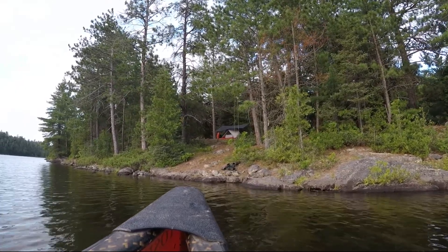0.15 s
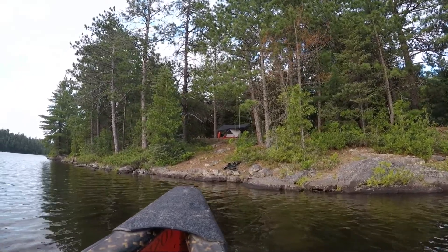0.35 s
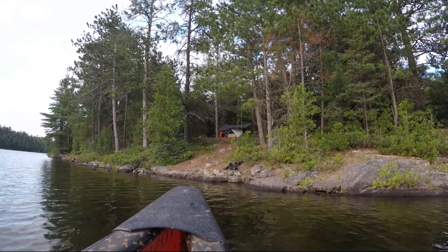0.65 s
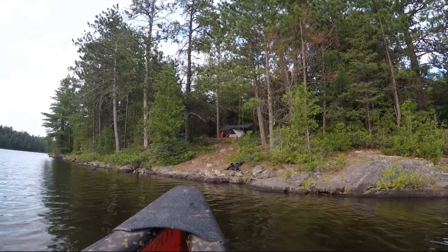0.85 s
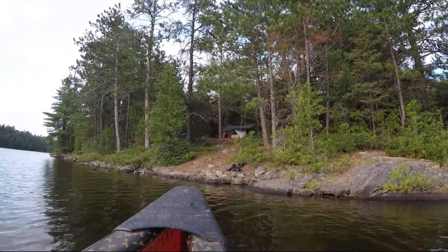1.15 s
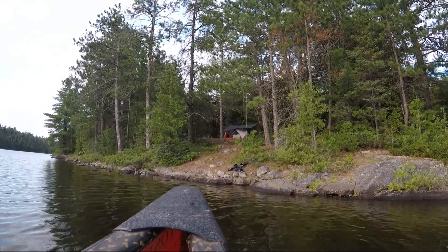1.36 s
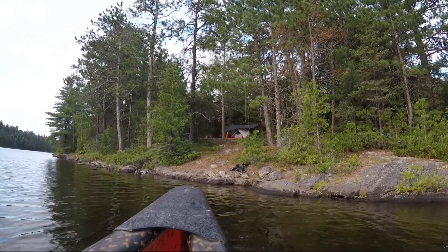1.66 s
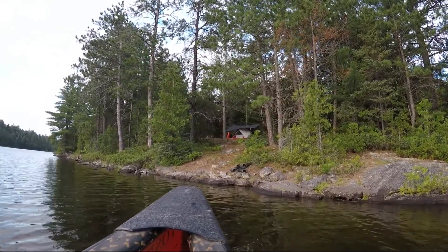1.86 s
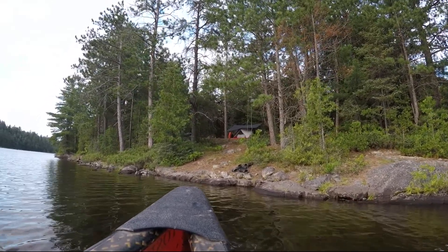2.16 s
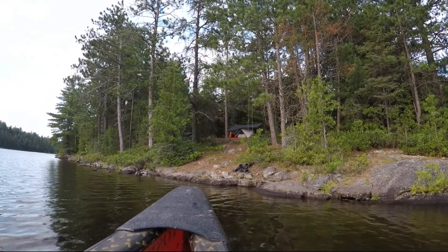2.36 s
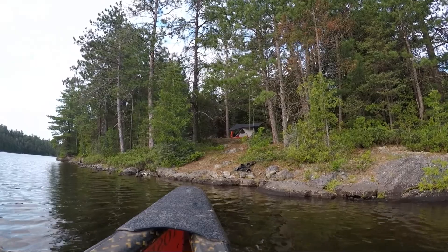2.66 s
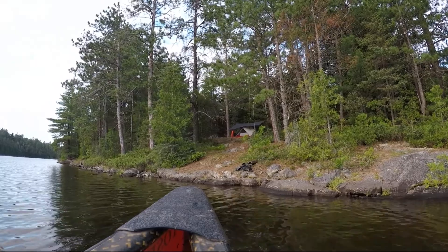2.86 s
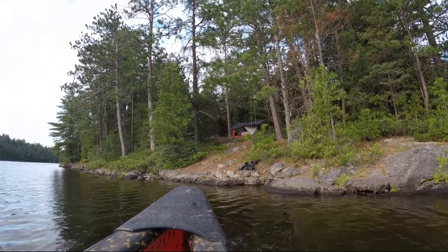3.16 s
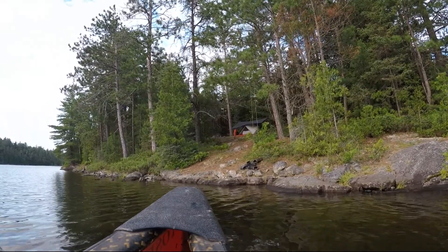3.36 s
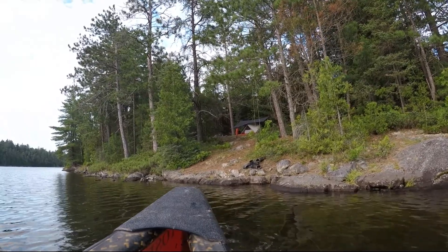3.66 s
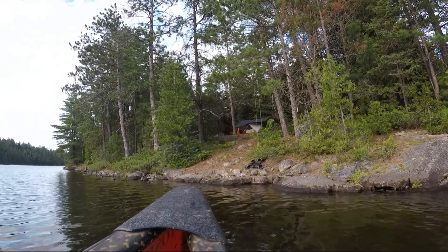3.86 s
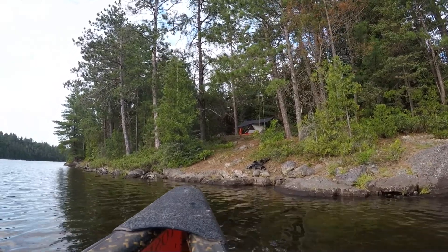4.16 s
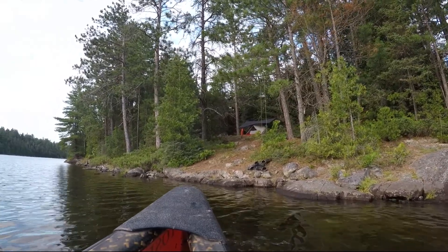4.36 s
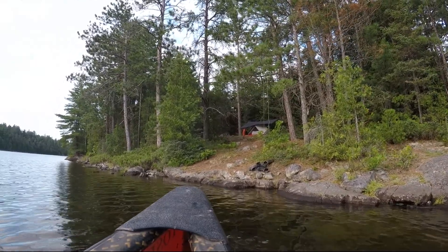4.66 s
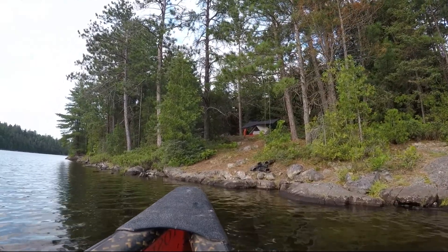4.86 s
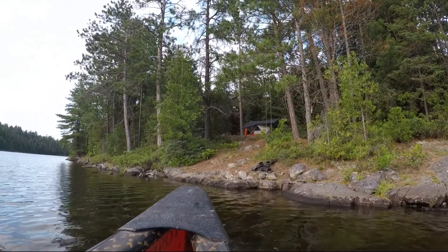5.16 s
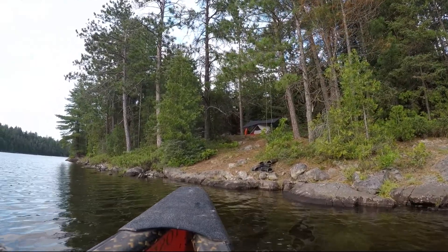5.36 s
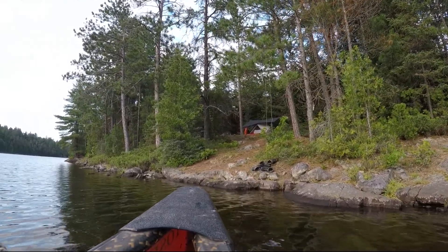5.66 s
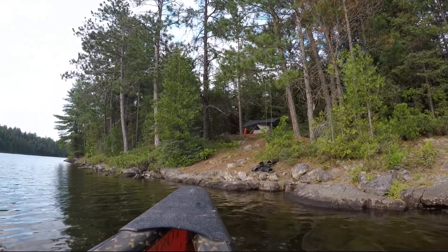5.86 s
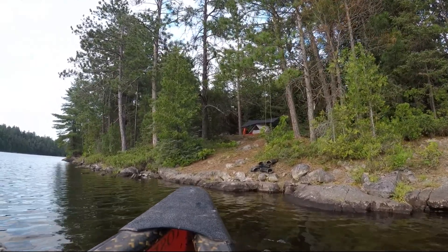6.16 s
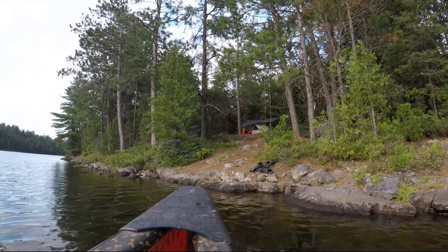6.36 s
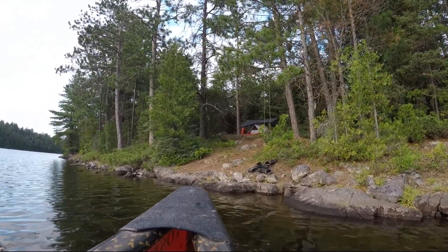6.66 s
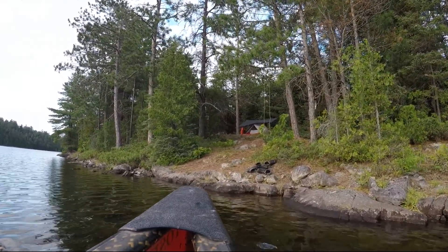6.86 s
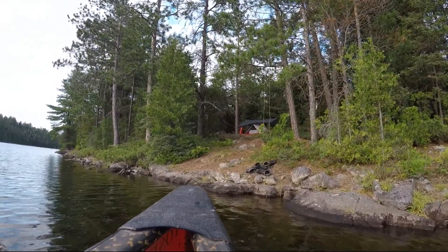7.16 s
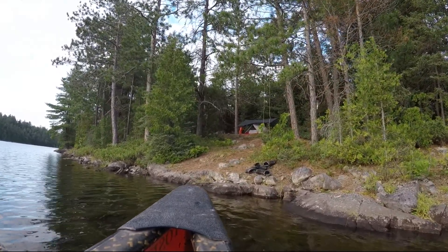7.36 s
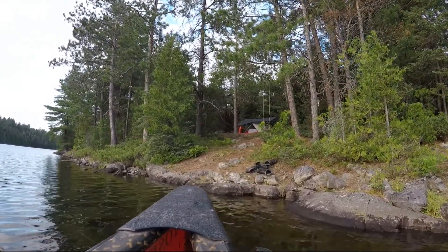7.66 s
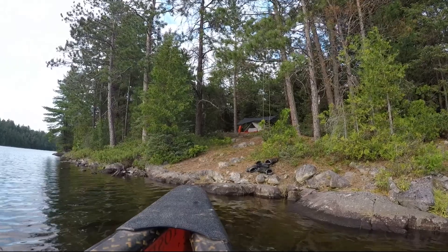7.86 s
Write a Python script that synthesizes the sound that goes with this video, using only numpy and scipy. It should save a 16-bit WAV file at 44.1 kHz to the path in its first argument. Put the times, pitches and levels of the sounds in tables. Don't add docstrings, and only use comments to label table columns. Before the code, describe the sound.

A paddle shaft knocks and drags on a hollow canoe hull, one hard slam midway, with faint lapping water and a brief wet swish.

```python
import sys
import numpy as np
from scipy import signal
from scipy.fft import rfft, irfft, next_fast_len
from scipy.io import wavfile
from scipy.ndimage import uniform_filter1d, map_coordinates

SR = 44100
rng = np.random.default_rng(int(sys.argv[2]) if len(sys.argv) > 2 else 0)


def file_out(sig):
    cols = np.atleast_2d(sig).T
    lim = np.clip(cols, -1, 1)
    pcm = np.round(lim * 32767).astype(np.int16)
    wavfile.write(sys.argv[1], SR, pcm)


def ratio(d):
    e = np.asarray(d, float) / 20
    return 10 ** e


N = 353241

# time_s, level_db
HISS_LEVEL = [(0.0, -66), (3.7, -66), (4.71, -67), (6.47, -66), (6.67, -66), (7.09, -65.5), (8.01, -67)]
# freq_hz, density_db
HISS_SPECTRUM = [(880, -2), (1500, -2), (1740, -4), (1890, -3.5), (2050, -6), (2210, -5), (3270, -15.5),
                 (4590, -11), (7040, -13.5), (7990, -10.5), (9800, -11), (11000, -14), (11600, -20),
                 (12300, -18), (14300, -19.5), (15300, -22)]
# time_s, level_db
WIND_LEVEL = [(0, -53.5), (.3, -58.5), (.47, -38.5), (.65, -48.5), (1.2, -45.5), (1.5, -50.5), (1.63, -38),
              (1.94, -45), (2.85, -42.5), (3.48, -51.5), (3.7, -48), (4.7, -42.5), (5.04, -43.5),
              (5.33, -38), (6.4, -54), (6.75, -58.5), (7.5, -41.5), (8.01, -37.5)]
# freq_hz, density_db
WIND_SPECTRUM = [(8.8, -29.5), (15, -4.5), (32, 2), (85, -5), (110, -35.5), (190, -120)]
WATER_SPECTRUM = [(110, -14), (190, -3), (323, -4), (550, -10), (596, -10), (661, -12), (3000, -34.5),
                  (3900, -39), (6600, -120)]
# peak_s, rise_s, fall_s, level_db
SURGES = [(.4, .3, 0.313, -51.5), (2.25, 0.19, 0.36, -61.5), (3.6, 0.63, 0.336, -49.5),
          (4.15, 0.13, 0.56, -46), (5.1, 0.61, 0.566, -55), (6.8, 0.37, 1.8, -50.5)]
# time_s, load_db, trim_db (toward the deep mode)
LOAD = [(0, -54, -1), (.3, -56.5, 1), (.56, -43.5, 7), (1.4, -56.5, -3), (1.72, -38.5, 8.5), (2.0, -53, 5),
        (2.7, -53, 3), (3.01, -47.5, 4.5), (3.55, -55, 3), (3.7, -47, 11), (3.97, -45.5, -15),
        (4.17, -46.5, 6), (4.6, -45.5, -4), (5.44, -55.5, 11), (6.2, -56, -2), (7.1, -61, -12.5),
        (7.45, -51, -2.5), (8.01, -53.5, -4)]
# freq_hz, width_hz, level_db
HULL_MODES = [(100, 73, 0), (170, 74.7, 0)]
# time_s, level_db
TREBLE_HISS_LEVEL = [(6.15, -84), (6.3, -78), (6.5, -67.5), (7.0, -68), (7.7, -69), (8.01, -77)]
# freq_hz, density_db
TREBLE_HISS_SPECTRUM = [(6500, -32), (7800, -7.5), (9000, 4.5), (10500, -5), (11500, 3), (12300, -16),
                        (15000, -30.5)]
# start_s, peak_db, pitch_hz, housing_4khz_db, housing_6khz_db
TICKS = [(0.435, -51, 1550, 0.5, 1), (0.455, -54, 1520, -0.5, -11.5), (0.796, -43, 1500, -20, -25),
         (0.838, -49, 5380, -10, -5.5), (0.85, -45, 3710, 1.5, -2), (1.655, -57.5, 1298, 3, 0.5),
         (1.68, -56, 2100, 3.5, 3.5), (4.134, -67, 2600, 1, -10.5), (4.261, -55.5, 2600, 5, -8),
         (1.7494, -57.5, 1572, 9.5, -11.5), (2.1904, -44, 1840, -22, -22), (2.357, -44, 2050, -16.5, -15),
         (2.4839, -38, 2875, -11, -24.5), (4.4644, -43, 1650, -22, -15.5), (6.9521, -39, 950, -17, -25),
         (6.9708, -36.5, 2360, -18, -24), (6.992, -48, 1870, -7, -9.5), (7.2196, -45.5, 1670, -15, -15),
         (7.5414, -27.5, 1967, -1, -13), (3.597, -37, 820, -25.5, -31.5), (3.606, -29, 800, -20, -27),
         (2.486, -50, 3500, -6.5, -20)]
# start_s, peak_db
SPARKS = [(1.6377, -52), (1.6772, -52), (1.697, -58), (1.7036, -53), (1.718, -56), (.44, -62), (.85, -58)]
# peak_s, rise_s, fall_s, level_db, fullness_db (rustle over the housing's ring)
SWISHES = [(6.477, 0.0071, 0.0374, -45.5, -8), (6.545, 0.074, 0.0231, -43.5, -7.5),
           (6.656, .012, 0.0396, -57, -11.5), (6.692, 0.044, 0.023, -56.5, -7),
           (6.761, 0.024, 0.0473, -49.5, -8), (6.885, 0.1026, 0.0794, -47.5, -6.5),
           (7.012, 0.077, 0.071, -53.5, 0.5), (7.085, 0.0795, 0.0382, -46.5, -0.5),
           (7.118, 0.024, 0.038, -57, 2), (7.175, 0.0403, 0.037, -58, 4.5),
           (7.205, 0.042, 0.0194, -61, 6.5)]
# freq_hz, width_hz, level_db
HOUSING_MODES = [(2290, 450, -40), (2927, 290, 7.5), (4117, 580, 12.5), (4970, 210, -14.5), (5760, 590, 0),
                 (6785, 440, -2)]
# freq_hz, width_hz, level_db
RUSTLE_MODES = [(1232, 536, -2), (1650, 316, 3), (2264, 583, -1.5)]
RUSH_MODES = [(3500, 1070, 0.14), (4700, 1300, 2), (5900, 780, 0)]
# freq_hz, density_db
SPRAY_SPECTRUM = [(2000, -30.5), (3000, -11), (7500, -0.5), (9000, -2.5), (11300, -5), (12500, 1),
                  (15000, -5), (15500, -60.5)]
# peak_s, rise_s, fall_s, level_db, brightness_db
SCRAPES = [(.188, 0.094, 0.084, -52.5, -10.5), (.41, 0.085, 0.094, -52.5, -8),
           (.57, 0.0186, 0.091, -62.5, -9.5), (1.635, 0.044, 0.11, -48.5, -13),
           (1.675, .04, 0.038, -51.5, -18.5), (1.72, 0.074, 0.049, -56, 1),
           (4.13, 0.221, 0.11, -41.5, -24.5), (4.24, 0.1294, 0.1306, -39, -19),
           (4.49, 0.04, 0.12, -47, -22), (3.65, .03, .12, -46, -25), (4.3, .04, .03, -51, -25),
           (5.22, .03, .05, -60, -25)]
# freq_hz, density_db
SCRAPE_SPECTRUM = [(260, -37.5), (450, 1.5), (613, -16), (685, 2.5), (1020, -5.5), (1090, 4.5),
                   (1170, -2.5), (1500, -1), (3000, -20.5), (3900, -46), (6600, -120)]
GRIT_SPECTRUM = [(1650, -35.5), (2800, -31), (4140, 8), (4640, 7), (5860, 0.5), (6070, 6), (8000, -20),
                 (10400, -43), (17600, -120)]
# freq_hz, width_hz, level_db
SHAFT_MODES = [(1752, 190, -3.5), (2600, 270, -1.5), (3820, 260, -1.5), (4760, 300, -11), (5865, 350, -5)]
# peak_s, rise_s, fall_s, level_db, pitch_hz
GROANS = [(.2, 0.074, 0.113, -39.5, 138.1), (0.389, 0.038, 0.22, -35.5, 134.8),
          (.54, 0.256, 0.19, -43.5, 111.8), (1.636, 0.037, 0.25, -29, 128),
          (1.725, 0.095, 0.238, -27.5, 116), (4.196, 0.06, 0.11, -20.5, 119.8),
          (4.27, 0.0487, 0.223, -33, 136.9), (4.42, 0.168, .06, -36, 122.4),
          (4.522, 0.049, 0.0951, -27.5, 118.1), (4.62, 0.052, 0.204, -33, 125.6),
          (7.569, 0.17, 0.087, -33.5, 122.2), (7.75, 0.069, 0.038, -41.5, 100)]
# freq_hz, width_hz, level_db
RATTLE_MODES = [(231.5, 168, -3.0), (363.1, 73.6, 0.0), (415.7, 107, -6.0)]
# start_s, peak_db, shell_ring_db, snap_db, shaft_clack_db
CRACKS = [(0.44, -44, 2.5, -10.5, -19.5), (0.803, -31.5, -25, -22.5, -18.5), (1.421, -39.5, -15, -17, -5),
          (1.637, -44, 7, -9.5, -22), (1.692, -39.5, 4, -14.5, -16), (1.714, -43.5, 4.5, -10, 1),
          (2.81, -60.5, 14.5, -17.5, -11), (3.047, -58.5, 9, -2, -14), (3.6148, -19, 0.5, -14, -15.5),
          (3.626, -24, -8, -27, -13), (3.656, -33, 2, -18, -9), (3.897, -28, 2.5, -27.5, -18),
          (4.0235, -23.5, -3.5, -30.5, -1.5), (4.496, -48, 11.5, -23, -18), (4.934, -30, -6.5, -17.5, -5.5),
          (6.470, -38.5, -7.5, -8, -30), (7.478, -26, -12, -24, -9), (7.967, -28, -9, -23.5, -20.5)]
# freq_hz, density_db
CRACK_SPECTRUM = [(290, -5), (500, -21.5), (845, -7), (1070, -19), (1350, -17), (2410, -26.5),
                  (3000, -40.5), (3900, -32.5), (6600, -120)]
SNAP_SPECTRUM = [(1650, -14.5), (2800, -14), (3610, -15.5), (3920, -14), (5890, -18), (7230, -35),
                 (9440, -23), (15000, -39)]
# freq_hz, level_db, t60_s
SHELL_MODES = [(267, -3.5, 0.445), (348.65, -2, 0.214), (417.8, -8.5, 0.461), (530.4, -12.5, 0.305),
               (701.2, -6, 0.094), (835.1, -10, 0.227)]
# freq_hz, t60_s
SHELL_DECAY = [(300, 0.287), (1000, 0.079), (3000, 0.0803), (10000, 0.029)]
# start_s, peak_db, low_mode_hz, high_mode_hz, low_share_db
KNOCKS = [(0.377, -22, 101, 186, -1.5), (0.801, -50, 86, 156, -5), (1.42, -29.5, 110, 137, 2.5),
          (1.6, -26.5, 76.4, 140, 10.5), (1.637, -19.5, 131, 147.5, -9), (1.662, -18, 109, 135.5, -5.5),
          (1.683, -19, 130, 145, 4.5), (1.704, -12.5, 87.5, 100, 5.5), (1.715, -13, 71.9, 80, 1.5),
          (1.725, -16.5, 106, 152, 0), (1.751, -20.5, 91.3, 103, 10.5), (1.803, -22.5, 75, 94.6, 0),
          (2.805, -26.5, 115.5, 170, 1.5), (3.044, -16.5, 109.4, 177.8, 3), (3.895, -11, 100, 120, 6),
          (3.92, -12, 85, 125, 4.5), (4.023, -21.5, 140, 263.4, -7.5), (4.033, -11, 119.1, 130.4, 6.5),
          (4.501, -19, 108.8, 142, 1.5), (4.511, -14.5, 112.7, 124, 0.5), (4.554, -19.5, 100, 125, 2),
          (4.931, -22.5, 81.7, 160.9, -3), (4.958, -18.5, 135.5, 152.2, 1), (5.299, -29, 69.4, 161.3, 4.5),
          (7.313, -36.5, 71, 140.7, -4.5), (7.476, -13.5, 86.3, 160.5, -1), (7.965, -17, 97, 140, -0.5),
          (4.714, -26, 119.7, 139.4, 2.5), (4.621, -28, 125.4, 149.2, -4)]
# start_s, peak_db, low_mode_hz,
# high_mode_hz, t60_s
SHORT_RINGS = [(3.600, -22.5, 124, 254.5, 0.154), (3.6131, 7, 138.7, 198.6, 0.0332),
               (3.619, -10.5, 108.6, 194.6, 0.089), (3.628, -4, 192.3, 197, 0.098),
               (3.648, -9.5, 100, 109.7, 0.109), (3.658, -10.5, 105.4, 170, 0.09),
               (6.466, -15.5, 191, 290, 0.0204), (3.611, -6, 290, 320, 0.068), (3.63, -14, 300, 410.6, 0.11),
               (3.686, -19, 149, 199.3, 0.108), (3.611, -15, 680, 829, .09), (3.612, -26, 1050, 1280, .12),
               (3.612, -34, 1612, 2220, .1), (3.596, -41, 2200, 2330, .3), (5.305, -36, 300, 340, .1),
               (.625, -40, 380, 420, .12), (1.69, -19, 195, 220, .14), (3.9, -27, 400, 470, .1),
               (4.08, -43, 1200, 2200, .07), (4.105, -42, 1180, 1950, .06), (4.145, -45, 1600, 2300, .07),
           (4.175, -44, 1700, 1400, .07), (4.2, -40, 1500, 1560, .09), (4.225, -41, 1350, 1900, .07),
           (4.258, -38, 1150, 1700, .07), (4.29, -39, 1650, 1720, .08), (4.32, -45, 650, 1300, .06),
           (4.49, -34, 700, 740, .08), (4.515, -26, 300, 400, .08), (4.51, -47, 1900, 2000, .05),
           (4.73, -31, 290, 330, .09), (4.41, -36, 350, 400, .06), (1.63, -40, 900, 1300, .07),
           (1.645, -36, 560, 700, .08), (1.668, -37, 620, 800, .07), (1.712, -36, 650, 950, .07),
           (1.68, -48, 2200, 2300, .1), (1.71, -48, 2150, 2400, .1), (3.632, -25, 565, 800, .08),
           (3.655, -30, 750, 1400, .07), (3.68, -38, 700, 850, .08), (3.7, -31, 330, 420, .14),
           (7.474, -28, 720, 820, .05), (7.48, -27, 210, 300, .09), (7.964, -32, 400, 760, .06),
           (4.45, -36, 380, 430, .08), (4.09, -33, 300, 400, .09), (7.05, -42, 620, 700, .05),
           (1.418, -44, 1200, 2600, .04), (3.045, -24, 68, 80, .15)]


def unit(x):
    return x / np.sqrt(np.mean(x ** 2) + 1e-20)


def along(points, hz):
    f, v = np.transpose(points)
    return np.interp(np.log(hz + 1), np.log(f + 1), v)


def curves(rows):
    s, level, *cols = np.transpose(rows)
    t = np.arange(N) / SR
    return [np.interp(t, s, level, -150, -150)] + [np.interp(t, s, c) for c in cols]


def wobble(rate):
    knots = rng.standard_normal(int(N * rate / SR) + 4)
    return map_coordinates(knots, [np.arange(N) * rate / SR])


def noise(response):
    m = next_fast_len(N)
    spectrum = rfft(rng.standard_normal(m)) * response(np.fft.rfftfreq(m, 1 / SR))
    return unit(irfft(spectrum, m)[:N])


def shape(points):
    return lambda hz: ratio(along(points, hz))


def resonant(peaks):
    def response(f):
        total = 0
        for k, (center, width, db) in enumerate(peaks):
            peak = 1j * f * width / (center * center - f * f + 1j * f * width)
            total = total + (-1) ** k * ratio(db) * peak
        return total ** 2
    return response


def patchy(x, depth_db):
    z = signal.stft(x, nperseg=256)[2]
    field = uniform_filter1d(rng.standard_normal(z.shape), size=3, axis=0)
    field = uniform_filter1d(field, size=5, axis=1)
    return unit(signal.istft(z * ratio(depth_db * unit(field)), nperseg=256)[1][:N])


def swells(rows, steep):
    out, t = np.zeros((len(rows), N)), np.arange(N) / SR
    for k, (s, rise, fall, db, *_) in enumerate(rows):
        span = slice(max(int((s - rise) * SR), 0), int((s + fall) * SR))
        ramp = np.interp(t[span], [s - rise, s, s + fall], [0, 1, 0])
        out[k, span] = ratio(db) * np.abs(ramp) ** steep
    return out


def ring(t, hz, t60, attack):
    return np.sin(2 * np.pi * hz * t) * ratio(-60 * t / t60) * (1 - np.exp(-t / attack))


def burst(spectrum, t, soft):
    hz, u, z = signal.stft(rng.standard_normal(len(t)), SR, nperseg=128)
    decay_db = -60 * u / soft / along(SHELL_DECAY, hz)[:, None]
    z = z * ratio(along(spectrum, hz)[:, None] + decay_db)
    x = signal.istft(z, SR, nperseg=128)[1][:len(t)]
    x = x * (1 - np.exp(-t / (0.0004 * soft ** 5)))
    return x / np.abs(x).max()


def preamp_hiss():
    return ratio(curves(HISS_LEVEL)[0] + 7.5) * noise(shape(HISS_SPECTRUM))


def wind():
    thuds = unit(noise(shape(WIND_SPECTRUM)) * ratio(1.79 * wobble(12)))
    return ratio(curves(WIND_LEVEL)[0] + 0.5) * thuds


def water():
    wash = unit(noise(shape(WATER_SPECTRUM)) * ratio(1.3 * wobble(20)))
    calm_db = -55
    return np.hypot(ratio(calm_db), swells(SURGES, steep=0.5).sum(0)) * wash


def hull_murmur():
    load_db, trim_db = curves(LOAD)
    deep = unit(noise(resonant(HULL_MODES[:1])) * ratio(2.43 * wobble(20)))
    upper = unit(noise(resonant(HULL_MODES[1:])) * ratio(3.5 * wobble(30)))
    return ratio(load_db + trim_db) * deep + ratio(load_db - trim_db) * upper


def treble_hiss():
    return ratio(curves(TREBLE_HISS_LEVEL)[0]) * noise(shape(TREBLE_HISS_SPECTRUM))


def ticks():
    out, t = np.zeros(N + SR), np.arange(SR // 20) / SR
    for s, db, hz, mid_db, top_db in TICKS:
        mid = sum(ring(t, f * rng.normal(1, .015), .011, 0.0009) for f in (4150, 4400))
        top = sum(ring(t, f * rng.normal(1, .03), 0.0083, 0.0008) for f in (5900, 6600))
        tick = ring(t, hz, 0.00768, 0.00089) + ratio(mid_db - 4.5) * mid + ratio(top_db - 2.5) * top
        out[round(s * SR):][:len(t)] += ratio(db + 5.5) * tick
    return out[:N]


def sparks():
    out, t = np.zeros(N + SR), np.arange(SR // 40) / SR
    for s, db in SPARKS:
        bright = np.diff(rng.standard_normal(len(t) + 1))
        out[round(s * SR):][:len(t)] += ratio(db - 60 * t / .02) * (1 - np.exp(-t / .001)) * bright
    return out[:N]


def swish():
    grain = ratio(0.89 * wobble(170) + 1.35 * wobble(40))
    main = unit(grain * noise(resonant(HOUSING_MODES[1:4])))
    upper = unit(grain * noise(resonant(HOUSING_MODES[4:])))
    rustle = unit(grain * noise(resonant(RUSTLE_MODES)))
    spray = unit(grain * noise(shape(SPRAY_SPECTRUM)))
    rush = patchy(grain * noise(resonant(RUSH_MODES)), depth_db=4.0)
    strokes, full_db = swells(SWISHES, steep=1.206), np.transpose(SWISHES)[-1]
    out = ratio(-0.93 * np.maximum(full_db + 5.5, 0)) @ strokes * main
    out += ratio(0.9 * full_db) @ strokes * rush
    out += ratio(-8 + 0.55 * full_db) @ strokes * spray
    out += ratio(full_db) @ strokes * rustle
    return out + ratio(-7.5 + full_db) @ strokes * upper


def scrape():
    body = patchy(noise(shape(SCRAPE_SPECTRUM)) * ratio(.8 * wobble(140)), depth_db=1.8)
    grit = patchy(noise(shape(GRIT_SPECTRUM)) * ratio(1.1 * wobble(100)), depth_db=2.5)
    shaft = unit(noise(resonant(SHAFT_MODES)) * ratio(2.5 * wobble(60)))
    rub, bright_db = swells(SCRAPES, steep=1.243), np.transpose(SCRAPES)[-1]
    return ratio(-6.5) * (rub.sum(0) * (body + ratio(-18) * shaft) + ratio(bright_db) @ rub * grit)


def groan():
    drift, swell = np.cumsum(wobble(45)) / SR, ratio(wobble(34))
    peak_s, pitch_hz = np.transpose(GROANS)[[0, -1]]
    groan_hz = np.interp(np.arange(N) / SR, peak_s, pitch_hz)
    tone = unit(swell * np.sin(2 * np.pi * (np.cumsum(groan_hz) / SR + 12 * drift)))
    return ratio(-2.5) * swells(GROANS, steep=2.07).sum(0) * tone


def rattle():
    shell = unit(noise(resonant(RATTLE_MODES)) * ratio(2.3 * wobble(40)))
    by_groan = ratio(-15.5) * swells(GROANS, steep=2.07).sum(0)
    by_scrape = ratio(-3.5) * swells(SCRAPES, steep=1.243).sum(0)
    return (by_groan + by_scrape) * shell


def cracks():
    out, t = np.zeros(N + SR), np.arange(SR // 4) / SR
    clack = ring(t, 1128.4, 0.0452, 0.00145) + ring(t, 1314, 0.0394, 0.0007)
    clack = clack + 0.208 * ring(t, 2211, 0.076, 0.0018)
    for s, db, ring_db, snap_db, clack_db in CRACKS:
        soft = 1.045 - 0.0246 * (db + 34)
        upper = 0
        for hz, level, t60 in 2 * SHELL_MODES:
            a, b = rng.standard_normal(2)
            upper = upper + ratio(level + 2 * a) * ring(t, hz * (1 + 0.06457 * b), 0.677 * soft * t60, 0.00317)
        edge = burst(CRACK_SPECTRUM, t, soft) + ratio(snap_db + 4.5) * burst(SNAP_SPECTRUM, t, soft)
        edge = edge + ratio(clack_db - 3.5) * clack
        out[round(s * SR):][:len(t)] += ratio(db + 1.5) * (edge + ratio(ring_db - 5) * upper)
    return out[:N]


def knocks():
    out, t = np.zeros(N + SR), np.arange(SR // 4) / SR
    boom_t60_s, slam_share_db, delay_s = 0.166, -2, .004
    blows = [(*row, boom_t60_s) for row in KNOCKS]
    blows += [(*row, slam_share_db, t60) for *row, t60 in SHORT_RINGS]
    for s, db, low_hz, high_hz, share_db, t60 in blows:
        low = ratio(share_db) * ring(t, low_hz, 1.086 * t60, 0.00326)
        high = ratio(-share_db) * ring(t, high_hz, t60, 0.0018)
        out[round((s + delay_s) * SR):][:len(t)] += ratio(db - 7.0) * (low + high)
    return out[:N]


def scene():
    background = wind() + water() + hull_murmur() + treble_hiss()
    details = ticks() + sparks() + swish()
    paddle = scrape() + groan() + rattle() + cracks() + knocks()
    return (background + details + paddle)[None]


def low_pass(x):
    return signal.sosfilt(signal.butter(12, 15480, fs=SR, output="sos"), x)


def record(dry):
    wet = dry + preamp_hiss()
    m = next_fast_len(N)
    passband = np.fft.rfftfreq(m, 1 / SR) < 15300
    wet = irfft(rfft(wet, m) * passband, m)[:, :N]
    return low_pass(wet)


dry = scene()
out = record(dry)
file_out(out)
```